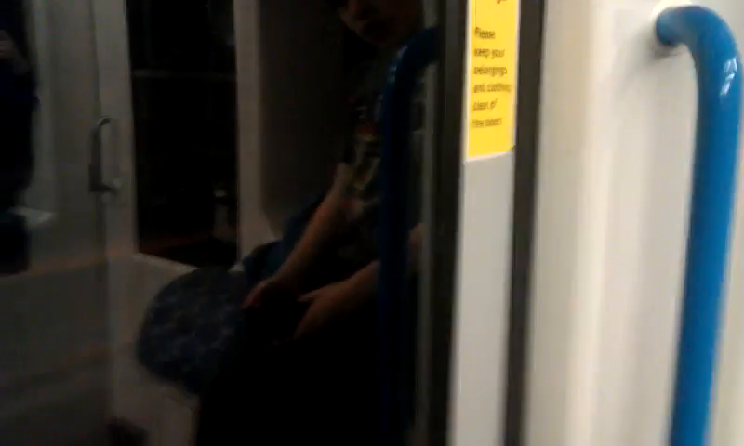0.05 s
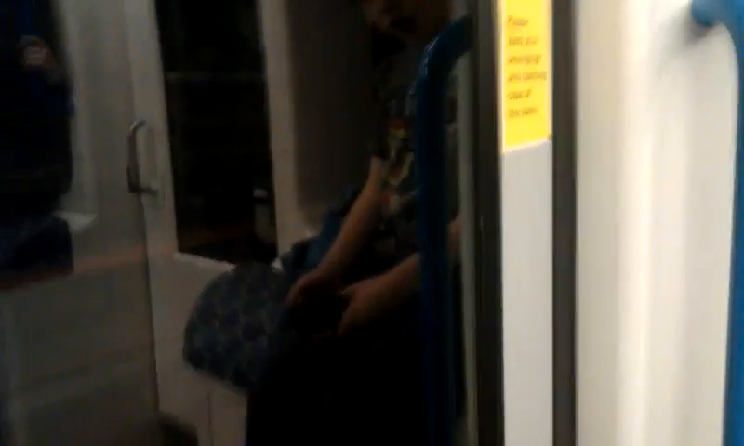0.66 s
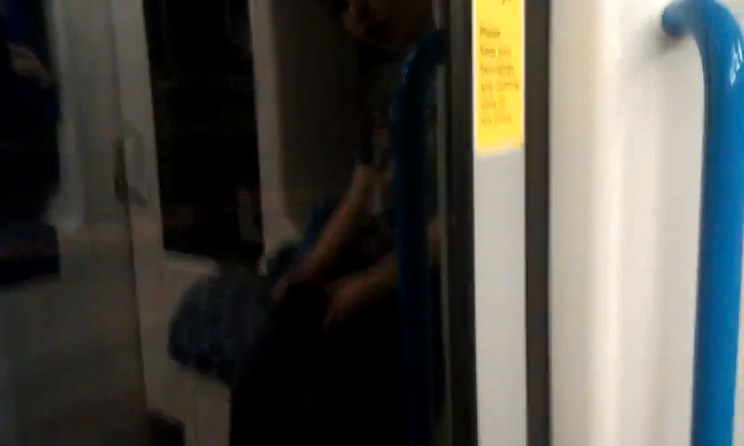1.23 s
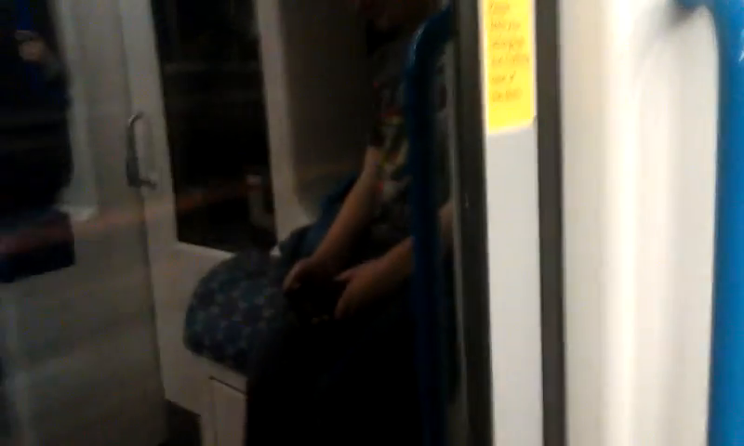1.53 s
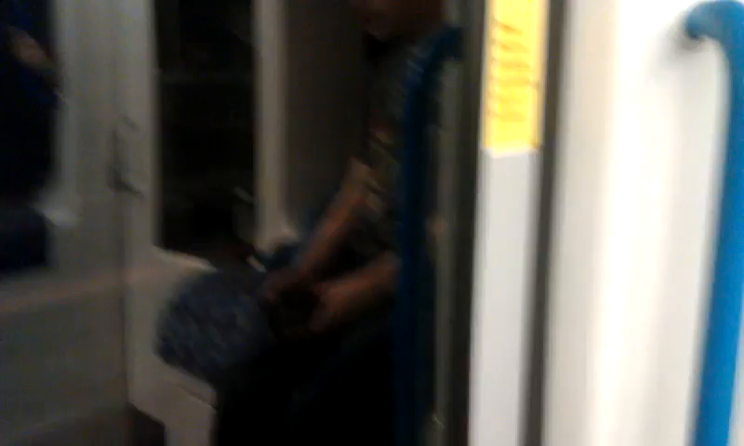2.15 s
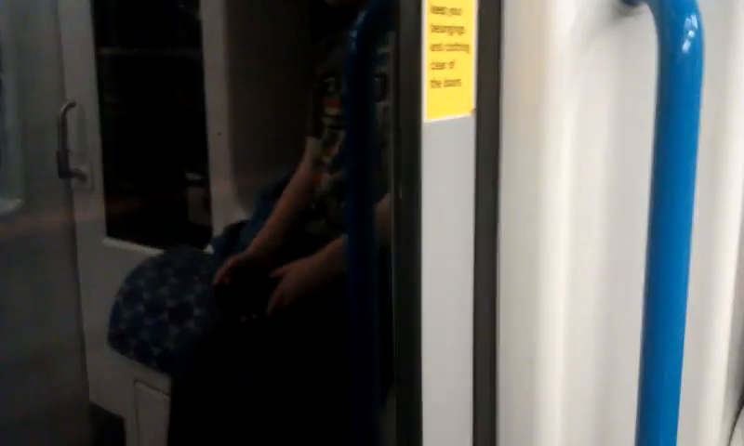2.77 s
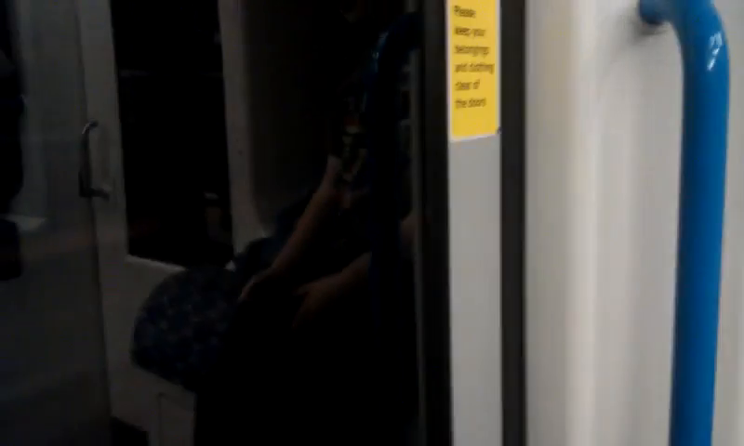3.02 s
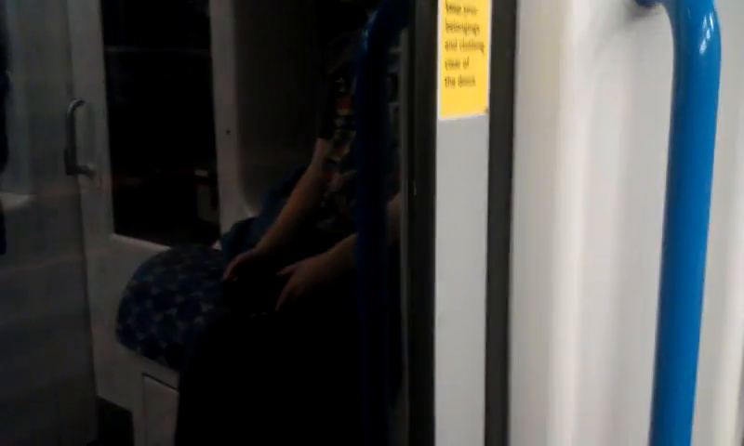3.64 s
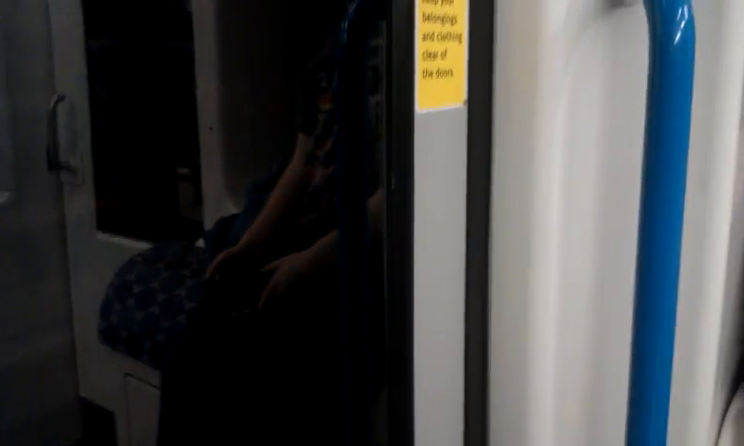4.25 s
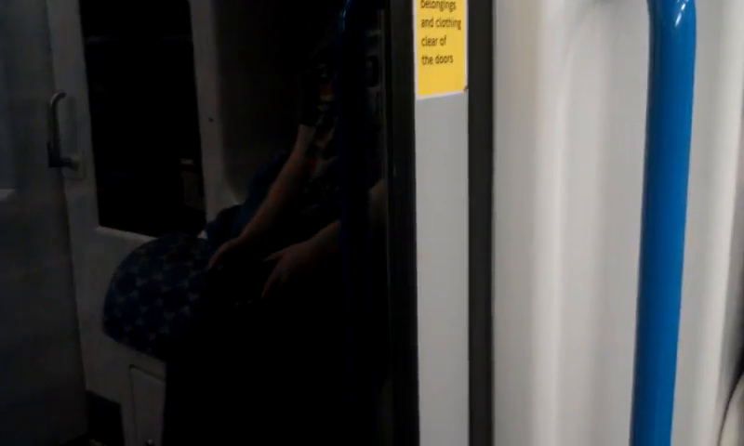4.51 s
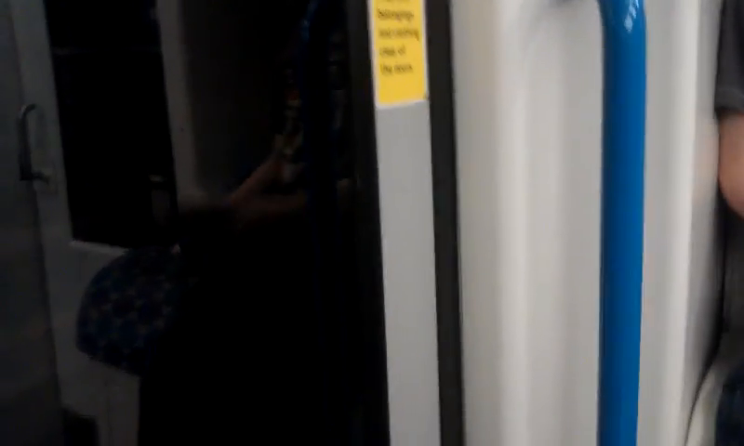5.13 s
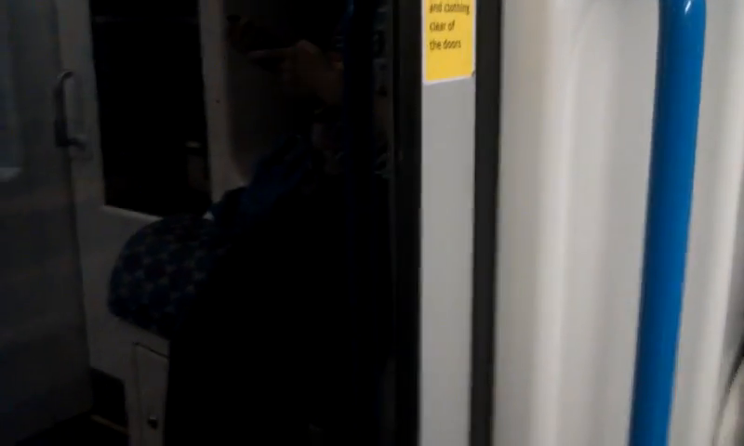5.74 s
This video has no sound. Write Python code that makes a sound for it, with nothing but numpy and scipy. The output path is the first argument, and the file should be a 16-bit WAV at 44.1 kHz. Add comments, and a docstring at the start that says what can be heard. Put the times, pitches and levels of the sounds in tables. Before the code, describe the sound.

The loud roar of wheels on rail fills an underground carriage throughout, surging unevenly over a low floor rumble and a soft hum. The wheels ring briefly at the start and near 0.6 seconds. The roar builds and is loudest from about 0.7 to 2 seconds, overloading the microphone so that the surges rasp. The rail gives short, wavering, mid-pitched howls at about 1, 1.5 and 1.8 seconds, with weaker ones between and near 2.4. A door chatters lightly, with firmer knocks near 0.1, 1.4, 1.8 and 3 seconds. From about 2 to 4 seconds the roar eases. A faint, high motor whine fades in after 3.2 seconds and sinks steadily as the train slows. Smaller surges, a brief howl near 4.6 seconds and a few wheel rings follow, with the train still rolling at 6 seconds.

```python
"""Inside an underground carriage running fast through a tunnel.
The wheels shake the body into a roar that surges on rough rail and eases as the track gets better.
The rail howls, the wheels ring, the floor rumbles, the running gear drones and a door rattles.
Later the drive's whine fades in and sinks as the train slows.
It is all so loud that the microphone overloads and rasps on the surges."""
import sys
import numpy as np
from scipy import signal
from scipy.fft import rfft, irfft
from scipy.io import wavfile
from scipy.ndimage import uniform_filter1d

SR = 44100
rng = np.random.default_rng(int(sys.argv[2]) if len(sys.argv) > 2 else 0)


def transcribe(u):
    """Save the signal u as a 16-bit wav file named by the first command-line argument.

    u: samples, shape (n,) or (channels, n), limited to [-1, 1]; the rate is SR.
    q: integer samples, one column per channel.
    """
    v = np.clip(np.atleast_2d(u).T, -1, 1)
    q = np.round(v * 32767).astype(np.int16)
    wavfile.write(sys.argv[1], SR, q)


N = 263716
TIME = np.arange(N) / SR
FREQS_HZ = np.fft.rfftfreq(N, 1 / SR)

# How hard ordinary rail shakes the wheels: time_s, force_db
TRACK_FORCE = [(0, -8.5), (0.7, -5), (1.7, -4.5), (2.15, -7.0), (2.75, -8.5), (3.4, -11.0), (4.1, -13),
               (5.98, -12)]
# Rougher (+) and smoother (-) stretches of rail: start_s, length_s, force_change_db
RAIL_PATCHES = [(0.069, 0.24, 2), (0.521, 0.24, 2.0), (0.838, 0.026, -3.0), (0.857, 0.1, 1.7),
                (0.979, 0.16, 3), (1.256, 0.036, -4.5), (1.394, 0.22, 2.5), (1.742, 0.25, 3.5),
                (2.22, 0.04, -4.0), (2.282, 0.27, 1.5), (2.497, 0.05, 1.5), (2.624, 0.076, -5.4),
                (2.84, 0.04, 3.5), (2.961, 0.03, -2.5), (2.994, 0.03, 3), (3.091, 0.04, 3),
                (3.178, 0.13, 3.5), (3.539, 0.08, -2.8), (3.648, 0.07, 4.5), (3.751, 0.16, 2.15),
                (4.191, 0.22, 5.5), (4.556, 0.12, 6), (4.676, 0.28, 4.0), (5.068, 0.03, 0.2),
                (5.267, 0.12, 3), (5.454, 0.056, 6), (5.663, 0.032, -3), (5.739, 0.1, 0.5),
                (5.849, 0.05, 4)]
# The rolling noise in the cabin, from bass to treble: frequency_hz, relative_level_db
ROAR_SPECTRUM = [(60, -53), (150, -31), (250, -12.5), (450, -1.5), (650, -4.5), (1000, -6.5), (1250, -11.5),
                 (1600, -19.5), (2200, -24.5), (3500, -35), (5000, -47), (6300, -48.5), (8000, -84)]
# Pitches at which the carriage and tunnel resonate: pitch_hz, width_hz, boost_db
CABIN_RESONANCES = [(394, 27, 2.5), (561, 164, 5), (764, 19, -1), (819, 120, 3), (956, 70, 5),
                    (1119, 28, 3), (1325, 30, 2), (1930, 230, 2.5)]
# Rippled stretches that make the rail howl: start_s, length_s, level_db, pitch_hz
RAIL_HOWLS = [(1.001, .13, -8, 515), (1.22, .2, -13.5, 581), (1.477, .13, -8, 530), (1.766, .24, -8.5, 525),
              (2.387, .28, -15.5, 528.7), (4.58, 0.064, -8, 529)]
# Moments when a wheel rings out: start_s, length_s, level_db
WHEEL_RINGS = [(0, 0.22, -14), (0.591, 0.25, -13), (3.06, 0.091, -14), (3.66, 0.07, -15.5),
               (5.06, 0.099, -16.5), (5.289, 0.18, -15.5), (5.724, .08, -14.5)]
# The floor's rumble, from bass to treble: frequency_hz, relative_level_db
FLOOR_SPECTRUM = [(20, -25.5), (50, -27.5), (100, -15), (145, -10.5), (175, -2.5), (210, -6), (260, 3.5),
                  (400, -5), (700, -19), (1500, -44.5)]
# Knocks of the door in its frame: time_s, relative_level_db
DOOR_KNOCKS = [(.106, -7), (.272, -11), (1.405, -6), (1.751, -8), (2.872, -11), (3.013, -8.5), (3.096, -14),
               (3.217, -16.5), (3.334, -15.5), (4.378, -16), (5.096, -16.5), (5.223, -19), (5.478, -15)]
# The door's ringing notes and the time each takes to fade by 60 dB: pitch_hz, relative_level_db, fade_s
DOOR_NOTES = [(1123, 4.5, 0.11), (1760, -7, 0.073), (2117, -4, 0.065), (2780, -5.5, 0.012),
              (3110, -5, 0.028), (3896, -7, 0.0063), (4690, -13.5, 0.013)]
# How the recorder boosts or cuts bass and treble: frequency_hz, gain_db
RECORDER_RESPONSE = [(30, -6.5), (80, -5), (200, 0), (4500, -1), (6000, -2.5), (7200, -7), (9000, 1),
                     (12000, -1.5), (15500, -12)]


def gain_of(db):
    """Turns decibels into a number to multiply a sound by."""
    return 10 ** (np.asarray(db) / 20)


def normalised(sound):
    """Scales a sound to an average power of one."""
    return sound / np.sqrt(np.mean(sound ** 2) + 1e-20)


def spectrum_db(points):
    """Joins a table's points into a level for every frequency."""
    hz, db = np.transpose(points)
    return np.interp(np.log(FREQS_HZ + 1), np.log(hz + 1), db)


def noise(shape):
    """Noise whose balance of bass and treble follows the given shape."""
    return normalised(irfft(rfft(rng.standard_normal(N)) * shape, N))


def drift(rate_hz):
    """A smooth random wobble, up to about the given rate."""
    return noise(1 / (1 + (FREQS_HZ / rate_hz) ** 4))


def swell(start_s, length_s, rise_s, fall_s):
    """Rises from zero to one, holds for the rest of the length, then falls back."""
    rising = (TIME - start_s) / rise_s
    falling = 1 - (TIME - start_s - length_s) / fall_s
    return np.clip(np.minimum(rising, falling), 0, 1)


def wavering_tone(hz, wander_hz, rate_hz, flutter_db):
    """A note kept ringing by the rolling wheels: its pitch and strength never hold still."""
    cycles = np.cumsum(hz + wander_hz * drift(rate_hz)) / SR
    return normalised(np.sin(2 * np.pi * cycles) * gain_of(flutter_db * drift(rate_hz)))


def breathy_tone(hz, width_hz):
    """A damped resonance fed by rolling noise: a soft band around a pitch that may glide."""
    cycles = np.cumsum(hz * np.ones(N)) / SR
    wobble = drift(width_hz / 2) + 1j * drift(width_hz / 2)
    return normalised((wobble * np.exp(2j * np.pi * cycles)).real)


def wheel_force():
    """How hard the rail shakes the wheels, in dB: the track's state, its patches and its tiny bumps."""
    track_db = np.interp(TIME, *np.transpose(TRACK_FORCE))
    patches_db = sum(db * swell(start, length, rise_s=0.024, fall_s=0.03)
                     for start, length, db in RAIL_PATCHES)
    return track_db + patches_db + 0.73 * drift(rate_hz=25)


def rolling_roar(force_db, level_db, throb_db, turn_hz):
    """Rolling noise resonates in the cabin and throbs slightly with each turn of the wheels."""
    boost_db = sum(db / (1 + (2 * (FREQS_HZ - hz) / width) ** 2) for hz, width, db in CABIN_RESONANCES)
    turns = np.cumsum(turn_hz * (1 + 0.064 * drift(rate_hz=2.4))) / SR
    throb = throb_db * np.sin(2 * np.pi * turns)
    return noise(gain_of(spectrum_db(ROAR_SPECTRUM) + boost_db)) * gain_of(level_db + force_db + throb)


def rail_howl(force_db):
    """The rail sings faintly all along and howls over each rippled stretch."""
    sound = gain_of(force_db - 13.5) * breathy_tone(hz=527.5, width_hz=18)
    for start, length, db, hz in RAIL_HOWLS:
        howl = wavering_tone(hz, wander_hz=6.97, rate_hz=18, flutter_db=2.0)
        sound += gain_of(db) * swell(start, length, rise_s=0.053, fall_s=0.064) * howl
    return sound


def wheel_ring(force_db):
    """The shaken wheels ring softly all along and flare up now and then."""
    flares = sum(gain_of(db) * swell(start, length, rise_s=0.045, fall_s=0.073)
                 for start, length, db in WHEEL_RINGS)
    strength = np.hypot(gain_of(force_db - 12), flares)
    pitch_hz = 763.5 + 10 * drift(rate_hz=4)
    return strength * breathy_tone(pitch_hz, width_hz=75)


def floor_rumble(force_db, level_db, force_share):
    """The floor shakes on its springs, which even out much of the surging."""
    return gain_of(level_db + force_share * force_db) * noise(gain_of(spectrum_db(FLOOR_SPECTRUM)))


def gear_drone(force_db):
    """The running gear under the carriage hums, barely following the surges."""
    hum = wavering_tone(hz=283, wander_hz=2.99, rate_hz=7, flutter_db=5.5)
    return gain_of(-26.5 + 0.14 * force_db) * hum


def door_rattle(force_db, knock_db, chatter_db, taps_per_s):
    """A few firm knocks and a chatter of light random taps ring the same door."""
    tap_db = chatter_db + 0.5 * force_db + rng.uniform(0, 6, N)
    blows = gain_of(tap_db) * (rng.random(N) < taps_per_s / SR)
    for time_s, db in DOOR_KNOCKS:
        blows[round(time_s * SR)] += gain_of(db + knock_db)
    age_s = TIME[:SR // 10]
    ringing = sum(gain_of(db - 60 * age_s / fade_s) * np.sin(2 * np.pi * (hz * age_s + rng.random()))
                  for hz, db, fade_s in DOOR_NOTES)
    ringing *= 1 - np.exp(-age_s / 0.00022)  # the rubber seal softens the blow
    return signal.oaconvolve(blows, ringing / abs(ringing).max())[:N]


def drive_whine(start_s, fade_in_s, start_hz, sink_hz_per_s, level_db):
    """The drive's whine fades in and sinks steadily as the train loses speed."""
    age_s = TIME - start_s
    fade_in = np.clip(age_s / fade_in_s, 0, 1)
    return gain_of(level_db) * fade_in * breathy_tone(start_hz - sink_hz_per_s * age_s, width_hz=230)


def dull_faint_treble(sound, above_hz, threshold_db, cut_db):
    """Turns the treble down while it is faint, so only the surges sound bright."""
    treble = irfft(rfft(sound) * (1 - 1 / (1 + (FREQS_HZ / above_hz) ** 30)), N)
    power = abs(uniform_filter1d(treble ** 2, size=1500)) + 1e-20
    let_through = 1 / (1 + (gain_of(threshold_db) ** 2 / power) ** 2)
    return sound - treble * (1 - let_through) * (1 - gain_of(cut_db))


def scene():
    """Mixes the carriage's sounds; all but the whine follow the force at the wheels."""
    force_db = wheel_force()
    mix = rolling_roar(force_db, level_db=-0.82, throb_db=0.45, turn_hz=10.4)
    mix += rail_howl(force_db) + wheel_ring(force_db)
    mix += floor_rumble(force_db, level_db=-21, force_share=0.57)
    mix += gear_drone(force_db)
    mix += door_rattle(force_db, knock_db=1.0, chatter_db=-25.5, taps_per_s=20)
    mix += drive_whine(start_s=3.2, fade_in_s=1.3, start_hz=3134, sink_hz_per_s=170, level_db=-41)
    return mix[None]


def record(dry):
    """The overloaded microphone flattens the peaks; the recorder then shapes the tone and trims treble."""
    ceiling, highest_hz = 0.695, 15800
    clipped = dry / (1 + abs(dry / ceiling) ** 24) ** (1 / 24)
    heard = irfft(rfft(clipped) * gain_of(spectrum_db(RECORDER_RESPONSE)), N)
    heard = dull_faint_treble(heard, above_hz=6150, threshold_db=-46, cut_db=-36)
    heard = dull_faint_treble(heard, above_hz=5280, threshold_db=-56, cut_db=-26.5)
    low_pass = signal.firwin(511, highest_hz, window=("kaiser", 9), fs=SR)
    return signal.oaconvolve(heard, low_pass[None], "same")


dry = scene()
out = record(dry)
transcribe(out)
```